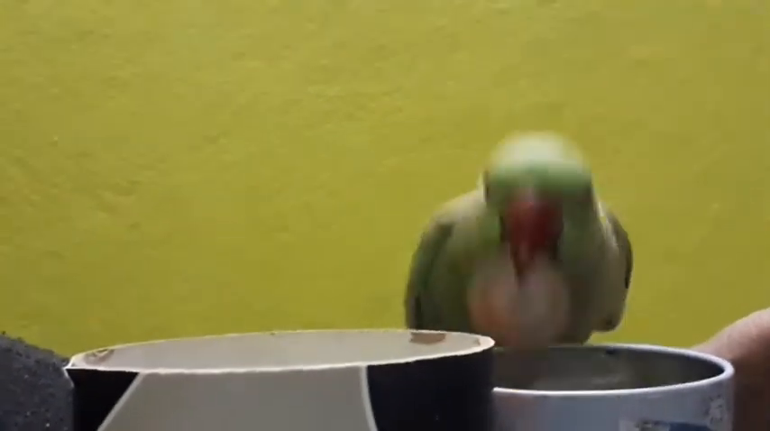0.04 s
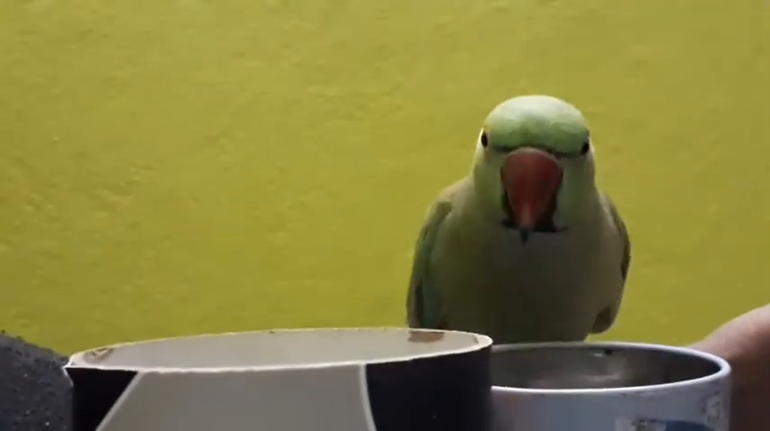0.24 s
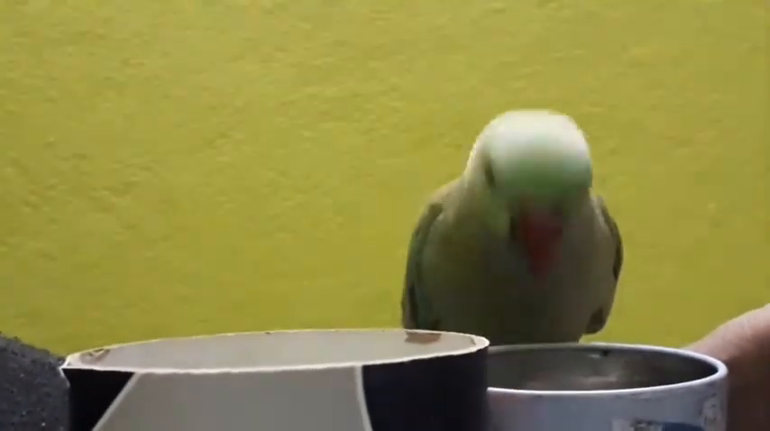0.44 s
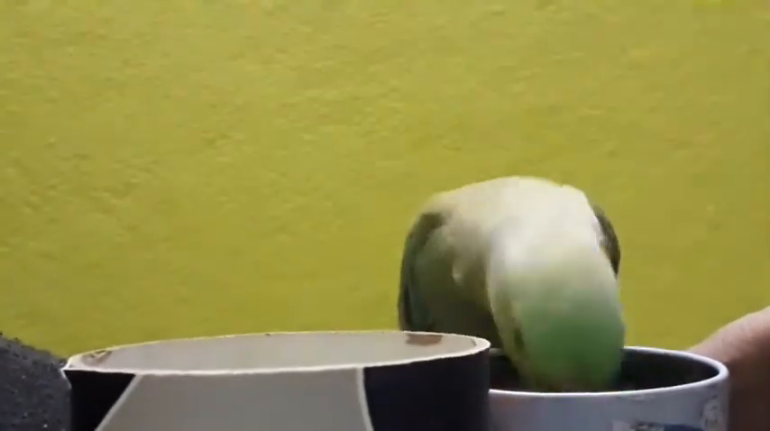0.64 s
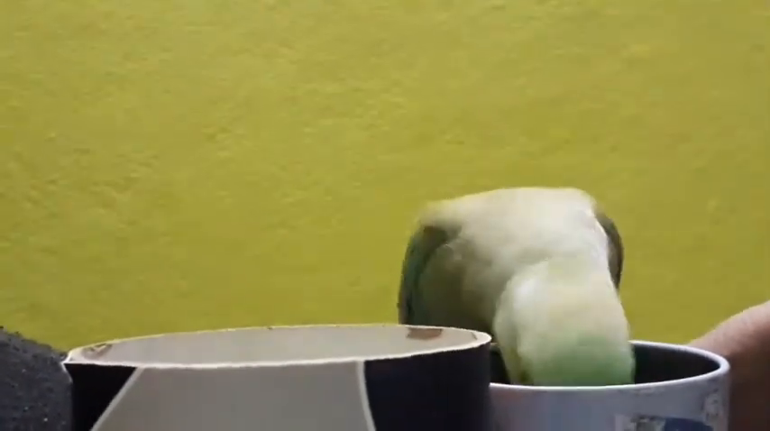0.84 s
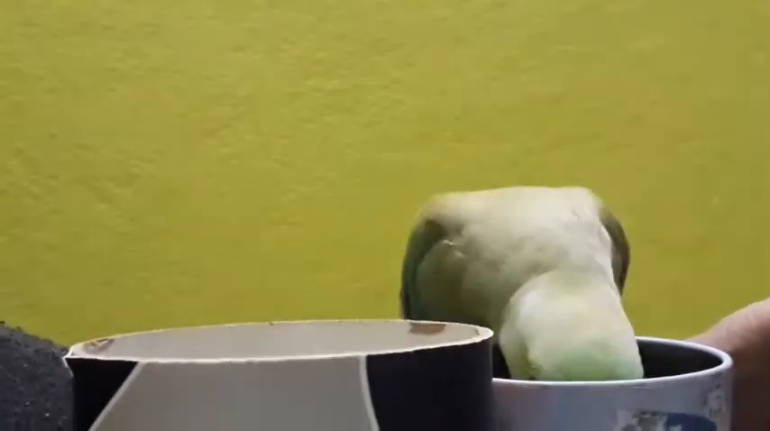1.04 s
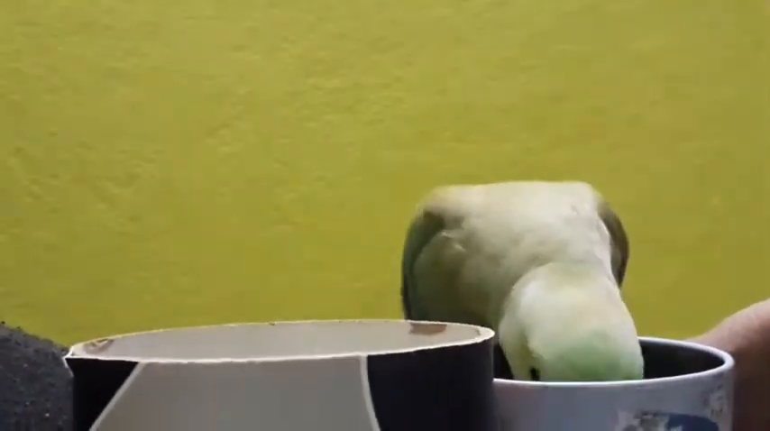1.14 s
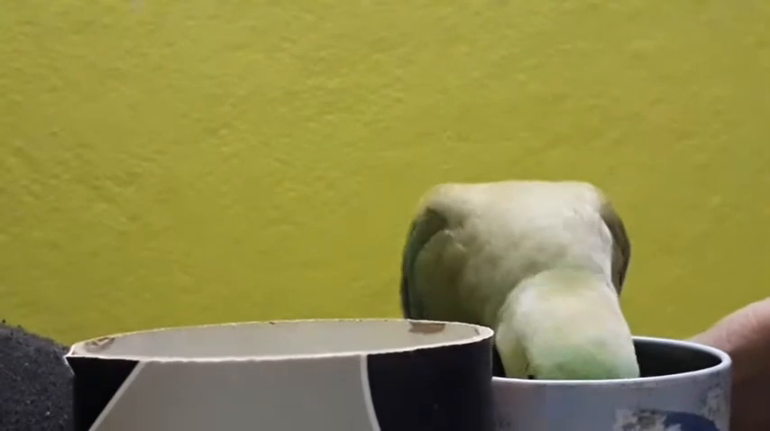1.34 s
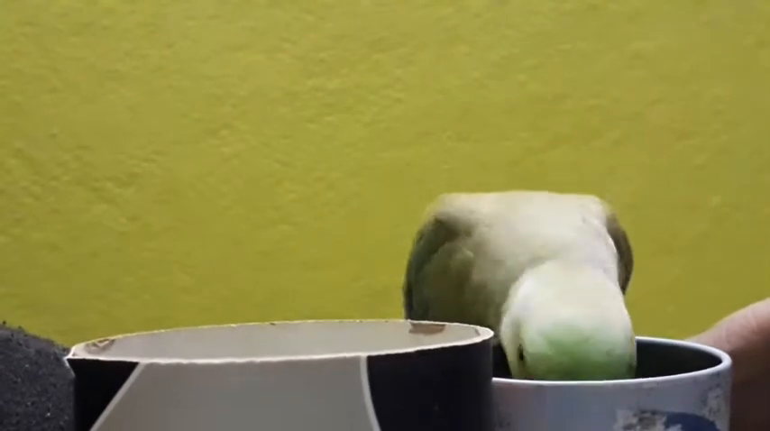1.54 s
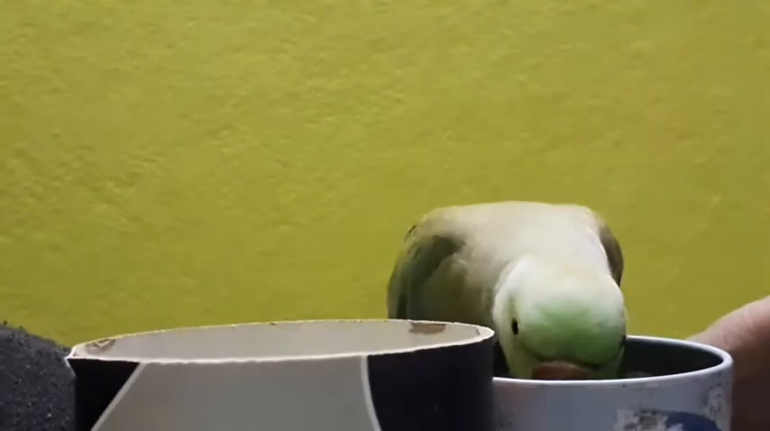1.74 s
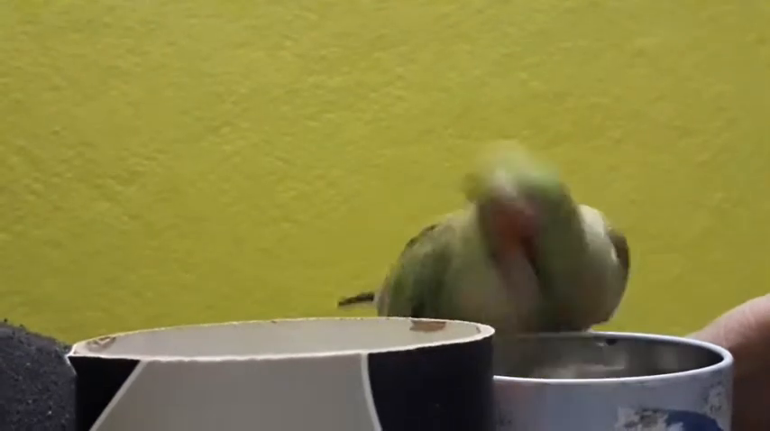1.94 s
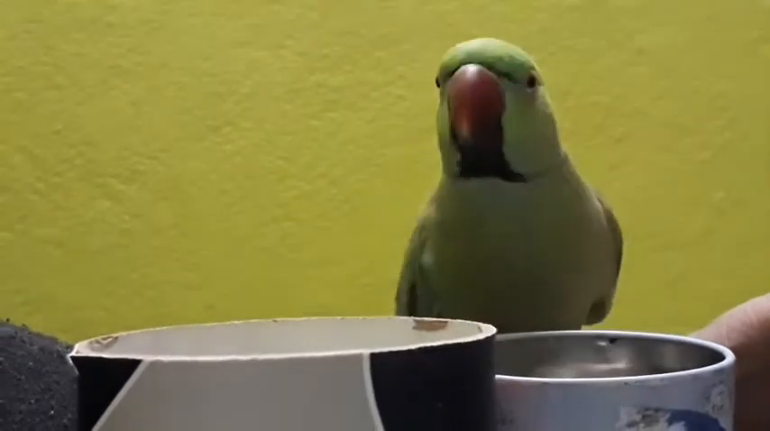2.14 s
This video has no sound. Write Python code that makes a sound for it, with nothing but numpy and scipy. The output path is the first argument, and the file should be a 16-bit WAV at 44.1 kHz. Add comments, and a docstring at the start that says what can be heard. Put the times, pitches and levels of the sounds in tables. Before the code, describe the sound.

Coins clatter loudly in a metal tin as a parakeet drops and picks them, then near quiet with tiny ticks, then a scraping, jingling rattle and a last clink; close phone microphone, small room.

```python
"""Coins clink, ring and scrape in a metal tin as a parakeet lifts, drops and stirs them, close to a phone.
Each contact is a short burst of ticks and noise that knocks the tin; free coins ring at pairs or groups of
close pitches until touched. Scrapes are rough noise with ticks, and faint squeaks are narrow bands of noise.
A small room adds a short tail. Behind it lie hiss, rumble, a hum and the dying tail of earlier clatter."""
import sys
import numpy as np
from scipy import signal
from scipy.fft import rfft, irfft
from scipy.io import wavfile
from scipy.ndimage import uniform_filter1d

SR = 44100
rng = np.random.default_rng(int(sys.argv[2]) if len(sys.argv) > 2 else 0)


def wav_record(signal):
    """Record a signal, one row per channel, as 16-bit PCM in the file named by sys.argv[1]."""
    frames = np.transpose(np.atleast_2d(signal))
    bounded = np.clip(frames, -1, 1)
    # unit amplitude maps onto the largest positive 16-bit level
    quanta = np.round(bounded * 32767).astype(np.int16)
    wavfile.write(sys.argv[1], SR, quanta)


N = 97020  # samples, 2.2 s

# Contacts of coin, beak and tin. Each row: start in seconds, nominal peak level in dB,
# relative strength of bass, middle and treble in dB, fading time of the chatter in ms.
CONTACTS = [(0.137, -40, -25.5, -22, 6, 4.6), (0.212, -11.5, -21.5, -12.5, -12, 4.5),
            (0.224, -10, -28.5, -17, -37, 2.3), (0.228, -6, -24, -10, -5.5, 5.8),
            (0.23, -2.5, -26, -13.5, 0, 3.9), (0.24, -7, -24, -19.5, -10, 3.8),
            (0.247, -13.5, -27.5, -17.5, -19, 5), (0.287, -3, -26, -17.5, -2, 1.3),
            (0.291, -7, -22, -14.5, -11, 4.85), (0.298, -14, -24, -7.5, -17, 0.92),
            (0.321, -14.5, -23, -19, -4, 2), (0.345, -3.5, -23, -15.5, -6.5, 2.4),
            (0.352, -10.5, -19, -12.5, -3, 3.3), (0.767, -51, -10.5, -13, -16.5, 2.5),
            (0.781, -45.5, -14, -10.5, -16, 2.5), (0.786, -56, -12.5, -7, -22, 3.3),
            (0.861, -30.5, -18, -9.5, -9, 0.96), (0.89, -41.5, -15, -22, -28, 1.52),
            (1.04, -61, -6, -22, -18, 4.5), (1.094, -38, -26, -10.5, -14.5, 1.66),
            (1.184, -28, -17.5, -6.5, -18.5, 2.5), (1.267, -44.5, -16, -13, -16.5, 4.9),
            (1.329, -48, -15, -9, -13.5, 1.28), (1.355, -44, -13.5, -5.5, -29.5, 1),
            (1.414, -51.5, -12, -12.5, -13, 2.3), (1.486, -42, -22, -4, -18.5, 0.83),
            (1.546, -23, -25, -10.5, -25, 3.6), (1.556, -26, -27, -3, -17, 0.9),
            (1.588, -27.5, -19, -3, -8, 1.3), (1.617, -17.5, -16, -12.5, -13.5, 1.95),
            (1.634, -19, -33, -30, -24.5, 5.4), (1.649, -20.5, -28, -22, -1, 4.8),
            (1.652, -20, -20, -29, -2, 1.4), (1.661, -27, -35, -17, -12, 3.7),
            (1.684, -16, -19, -17, -15.5, 3.7), (1.692, -18, -26, -10, -4, 1.2),
            (1.711, -7, -17.5, -6, -8, 3.63), (1.718, -15.5, -31.5, -29, -26, 2.1),
            (1.734, -15.5, -19, 0, 25, 2.2), (1.746, -28.5, -11.5, -4, -20, 1.8),
            (1.904, -38, -24, -9, -30, 0.83), (1.914, -25.5, -16, -6, -11, 0.93),
            (1.921, -19.5, -19, -7, -8.5, 1.07), (1.943, -11.5, -23.5, -15, -11.5, 2.66),
            (2.077, -57, -21.5, -3.5, -14.5, 1.8)]
# Basic colour of a contact. Each row: frequency in Hz, level in dB per Hz.
CONTACT_COLOUR = [(250, -20), (500, -17.5), (1000, -6.5), (2000, -2.5), (4000, 4), (8000, 0.5), (12000, 4),
                  (16500, -2)]
CHATTER_PER_S, CHATTER_SPREAD_DB = 7000, 3.5
RISE_SHARE = 0.3  # rise time as a share of the fading time
CREST = 3.16  # nominal peak over the rms of the loudest millisecond
BAND_WIDTH_DB = 10 * np.log10([1800, 4500, 9000])  # widths of bass, middle and treble, from Hz

# Damped modes (natural pitches) of the tin and the coins resting in it.
# Each row: frequency in Hz, width in Hz (at least 160 is used), level in dB.
TIN_MODES = [(550, 50, -1), (1048, 58, -1.5), (1550, 200, -17), (1920, 100, 3), (2350, 200, 0),
             (2650, 200, 0), (3140, 180, -7.5), (3800, 212, -4), (4110, 83, -9.5), (5100, 850, 2),
             (5940, 140, -14), (6640, 350, 0.5), (7500, 910, 0), (9900, 400, -4), (10100, 500, -1.5),
             (11300, 950, -1), (13600, 600, 1.5)]
TIN_DB, TIN_SCATTER_DB = -5, 3  # level beside the bare burst; random spread of each mode's level
TIN_SHIFT = 0.02  # random spread of each mode's pitch, as a share of it

# Modes of three coins. Each row: frequency in Hz, level in dB.
COIN_A_MODES = [(9097, -5), (9148, 0), (15180, 0), (15240, -3)]
COIN_B_MODES = [(9240, -4), (9290, -2), (9400, -5), (14300, -6), (14430, -3), (14530, 0)]
COIN_C_MODES = [(8910, -3), (8945, 0), (9055, -6), (14070, 0), (14190, -4), (14320, -3)]
# Blows that set each coin ringing. Each row: start in seconds, level in dB, extra level of the modes
# above 12 kHz in dB, time to fall by 60 dB in seconds, seconds until the coin is touched.
COIN_A_BLOWS = [(.136, -57.5, -1, 1.28, 0.065), (.213, -18.5, 5, 0.85, 0.0096),
                (.233, -27, 8.5, 0.29, 0.03), (.248, -22.5, 0, .3, 0.058), (.298, -29, 5, 0.1, 0.027),
                (1.654, -29, -2, .04, 0.011)]
COIN_B_BLOWS = [(.861, -58, -2, .12, .07), (1.0945, -57, -1, .12, .08), (1.269, -66, -3, .12, .07)]
COIN_C_BLOWS = [(1.722, -36, -5, .17, .07), (1.9435, -25, -8, .04, .022), (1.966, -56, -4, .2, .1)]

# Two stretches of coins dragged over each other. Each row: time in seconds, level in dB before tilting,
# tilt in dB (added above about 3 kHz and taken off below).
DRAGS = [
    [(.76, -78, -2.5), (.8, -70, -4.5), (.83, -59, -6.5), (.88, -65.5, -8), (.93, -67, -4.5),
     (.97, -83.5, 2)],
    [(1.18, -74, -22), (1.23, -65.5, -4.5), (1.3, -71.5, -6), (1.42, -72, -5), (1.5, -67.5, -7.5),
     (1.535, -64, 6), (1.55, -45.5, -3), (1.58, -44, -0.5), (1.61, -41.5, -1.5), (1.63, -34.5, -0.5),
     (1.642, -37.5, -0.5), (1.651, -23.5, 0.5), (1.659, -43.5, -10), (1.68, -38, -3), (1.70, -40, -2),
     (1.725, -31.5, 1), (1.75, -41, 0.5), (1.78, -59, 0), (1.84, -54, -6), (1.895, -58.5, -4),
     (1.91, -48, 5.5), (1.935, -52, -7), (1.96, -71, -0.5), (2.02, -73, 1), (2.2, -74.5, -7.5)],
]
# Colour of the scraping. Each row: frequency in Hz, level in dB per Hz.
DRAG_COLOUR = [(120, -55), (200, -20.5), (573, 2.5), (1290, 0.5), (4290, 10.5), (9310, 7), (11000, -4.5),
               (15300, 4), (16500, -15.5)]
DRAG_TICKS_PER_S, DRAG_SPREAD_DB = 3000, 3

# Faint squeaks. Each row: start in seconds, level in dB before the swell, frequency in Hz, length in seconds.
SQUEAKS = [(.82, -61.5, 1317, 0.044), (.822, -65.5, 4020, 0.022), (0.86, -62, 1533, .03),
           (1.807, -53, 1300, 0.039), (1.83, -62, 1480, 0.049), (2.061, -70, 402, 0.083),
           (2.12, -68.5, 546, 0.13)]
SQUEAK_WIDTH_HZ = 110

# Decay of the room. Each row: frequency in Hz, time to fall by 60 dB in seconds.
ROOM_DECAY = [(500, .34), (2000, 0.17), (6000, 0.22), (16000, 0.14)]
ROOM_DB, ROOM_RISE_S = -7, 0.0013

# Colour of the low part of the quiet floor. Each row: frequency in Hz, level in dB per Hz.
LOW_FLOOR_COLOUR = [(15, -65), (25, -45), (102, -10), (166, -22.5), (308, -17.5), (328, -30), (386, -18),
                    (618, -20), (1200, -33.5), (1560, -70), (2640, -120)]
# Colour of the hiss. Each row: frequency in Hz, level in dB per Hz.
HISS_COLOUR = [(590, -35.5), (1000, -7.5), (2050, -12), (2230, -15), (2620, -10.5), (7020, -21),
               (16000, -16.5)]
LOW_FLOOR_DB, HISS_DB = -75.5, -77.5
# Changing level of the rumble. Each row: time in seconds, level in dB.
RUMBLE_LEVEL = [(0.0, -58), (0.2, -58), (0.46, -70.5), (0.85, -80.5), (1.19, -80.5), (1.56, -74),
                (1.73, -71), (2.2, -71)]
# Colour of the rumble. Each row: frequency in Hz, level in dB per Hz.
RUMBLE_COLOUR = [(24, -32.5), (40, -4), (140, 4.5), (386, -6), (482, -15.5), (541, -3.5), (900, -11),
                 (1170, -53.5), (1980, -120)]
HUM_HZ, HUM_DB, HUM_WAVER_DB = 95.4, -67.5, 2  # the pitch and level wander around these
# Colour of the tail of earlier clatter. Each row: frequency in Hz, level in dB per Hz.
EARLIER_COLOUR = [(470, -38.5), (800, -17.5), (1210, -20.5), (1340, -17), (3420, -3.5), (4340, -12.5),
                  (9690, -21), (16000, -27.5)]
EARLIER_DB, EARLIER_T60_S = -56.5, 0.65  # level at the start; time to fall by 60 dB
# Difference between the channels. Each row: frequency in Hz, level in dB relative to the middle.
SIDE_COLOUR = [(30, -28), (80, -44), (300, -32), (700, -38), (1500, -50), (3500, -52), (4800, -27),
               (16000, -30)]


def undb(db):
    """Turn dB into gain."""
    return 10 ** (np.asarray(db) / 20)


def unit(x):
    """Scale to rms 1."""
    return x / np.sqrt(np.mean(x ** 2) + 1e-30)


def at_hz(table, hz):
    """Read a table of frequency and value on a log-frequency axis."""
    table = np.array(table, float)
    return np.interp(np.log(np.maximum(hz, 1)), np.log(table[:, 0]), table[:, 1])


def colour(x, table):
    """Filter x with the gains of a table of Hz and dB."""
    hz = np.arange(len(x) // 2 + 1) * SR / len(x)
    return irfft(rfft(x) * undb(at_hz(table, hz)), len(x))


def coloured_noise(table):
    """Steady noise of rms 1 with the colour of a table."""
    return unit(colour(rng.standard_normal(N), table))


def add(out, x, s):
    """Mix x into out from time s in seconds."""
    i = int(round(s * SR))
    out[i:i + len(x)] += x[:len(out) - i]


def walk(rate):
    """Slow random wander with a spread near 1, from smoothed random steps (rate per second)."""
    k = int(SR / rate)
    steps = np.repeat(rng.standard_normal(N // k + 1), k)
    return 1.3 * uniform_filter1d(uniform_filter1d(steps, k), k)[:N]


def ticks(size, per_s, spread_db):
    """Random ticks of either sign and uneven strength."""
    present = rng.random(size) < per_s / SR
    strength = undb(spread_db * np.minimum(rng.exponential(size=size), 4))
    return present * np.sign(rng.standard_normal(size)) * strength


def clinks():
    """Each contact is a fading burst of ticks and noise that knocks the damped modes of the tin."""
    out, t = np.zeros(N), np.arange(4096) / SR
    hz, width, db = np.array(TIN_MODES, float).T[:, :, None]
    damping = np.exp(-np.pi * np.maximum(width, 160) * t)
    for s, peak_db, bass_db, mid_db, treble_db, ms in CONTACTS:
        env = (1 - np.exp(-t * 1000 / (RISE_SHARE * ms))) * np.exp(-t * 1000 / ms)
        chatter = ticks(len(t), CHATTER_PER_S, CHATTER_SPREAD_DB)
        burst = env * (chatter + rng.standard_normal(len(t)))
        gains = undb(db + TIN_SCATTER_DB * rng.standard_normal(hz.shape))
        mode_hz = hz * (1 + TIN_SHIFT * rng.standard_normal(hz.shape))
        tin = (gains * np.sin(2 * np.pi * mode_hz * t) * damping).sum(axis=0)
        knocked = signal.fftconvolve(burst, tin)[:len(t)]
        hit = unit(burst) + undb(TIN_DB) * unit(knocked)
        hit = np.roll(hit, 64)  # leave room for what the colouring spreads ahead of the onset
        bands = np.array([bass_db, mid_db, treble_db]) - BAND_WIDTH_DB
        hit = colour(colour(hit, CONTACT_COLOUR), list(zip([1400, 4200, 11000], bands)))
        loudest_rms = np.sqrt(uniform_filter1d(hit ** 2, size=44).max())
        add(out, undb(peak_db) * hit / loudest_rms / CREST, s - 64 / SR)
    return out


def coin(modes, blows):
    """A coin's closely spaced modes ring from each blow and die fast once it is touched."""
    out, t = np.zeros(N), np.arange(6000) / SR
    hz, db = np.array(modes, float).T[:, :, None]
    for s, level_db, upper_db, t60, free in blows:
        gains = undb(db + upper_db * (hz > 12000))
        tone = (gains * np.sin(2 * np.pi * (hz * t + rng.random(hz.shape)))).sum(axis=0)
        rise = 1 - np.exp(-t / 0.00029)
        ringing = 1000. ** (-t / t60)
        touched = np.exp(-np.maximum(t - free, 0) / 0.0027)
        add(out, undb(level_db) * tone * rise * ringing * touched, s)
    return out


def scrapes():
    """Dragged coins make rough noise with dense ticks on a level curve, duller or brighter by the tilt."""
    t, out = np.arange(N) / SR, np.zeros(N)
    grit = ticks(N, DRAG_TICKS_PER_S, DRAG_SPREAD_DB) + 4.2 * rng.standard_normal(N)
    grit = colour(grit, DRAG_COLOUR)
    grit = grit / np.std(grit)
    low = signal.sosfilt(signal.butter(2, 3000, fs=SR, output="sos"), grit)
    for rows in DRAGS:
        s, db, tilt_db = np.array(rows, float).T
        gain = undb(np.interp(t, s, db)) * (t > s[0]) * (t < s[-1])
        tilt = undb(np.interp(t, s, tilt_db))
        out += gain * (low / tilt + (grit - low) * tilt)
    return out


def squeaks():
    """Faint rough squeaks: narrow noise in a soft swell."""
    out = np.zeros(N)
    for s, db, hz, length in SQUEAKS:
        t = np.arange(int(length * SR)) / SR
        reach = 3 * SQUEAK_WIDTH_HZ
        narrow = colour(rng.standard_normal(8192), [(hz - reach, -45), (hz, 0), (hz + reach, -45)])
        swell = np.sin(np.pi * t / length)
        add(out, undb(db) * unit(narrow[:len(t)]) * swell, s)
    return out


def room(x):
    """A diffuse tail: one noise split into overlapping octave bands, each with its own decay."""
    t, tail = np.arange(int(SR / 2)) / SR, 0
    noise = rfft(rng.standard_normal(len(t)))
    octave = np.log2(np.maximum(np.arange(len(t) // 2 + 1) * SR / len(t), 125))
    for hz in 125 * 2. ** np.arange(8):
        band = irfft(noise * np.clip(1 - np.abs(octave - np.log2(hz)), 0, 1), len(t))
        tail = tail + band * 1000. ** (-t / at_hz(ROOM_DECAY, hz))
    tail = tail * np.clip(t / ROOM_RISE_S, 0, 1)
    return undb(ROOM_DB) * signal.fftconvolve(x, tail / np.sqrt(np.sum(tail ** 2)))[:N]


def earlier_clatter():
    """Coloured noise that fades from the start, as the dying tail of earlier clatter."""
    fade = 1000. ** (-np.arange(N) / SR / EARLIER_T60_S)
    return undb(EARLIER_DB + 1.3 * walk(29.2)) * fade * coloured_noise(EARLIER_COLOUR)


def rumble():
    """Low noise that follows a level curve and flutters slightly."""
    s, db = np.array(RUMBLE_LEVEL, float).T
    level_db = np.interp(np.arange(N) / SR, s, db) + 0.83 * walk(42)
    return undb(level_db) * coloured_noise(RUMBLE_COLOUR)


def hum():
    """A low sine tone whose pitch and level waver."""
    phase = 2 * np.pi * np.cumsum(HUM_HZ * (1 + 0.015 * walk(5.1))) / SR
    return undb(HUM_DB + HUM_WAVER_DB * walk(2.8)) * np.sin(phase)


def quiet_floor():
    """A slowly wavering low noise and a steady hiss."""
    low = undb(LOW_FLOOR_DB + 2.0 * walk(9.5)) * coloured_noise(LOW_FLOOR_COLOUR)
    return low + undb(HISS_DB) * coloured_noise(HISS_COLOUR)


def scene():
    """All sources sit in the middle; a smeared copy makes the two channels differ faintly."""
    coins = coin(COIN_A_MODES, COIN_A_BLOWS) + coin(COIN_B_MODES, COIN_B_BLOWS) + coin(COIN_C_MODES, COIN_C_BLOWS)
    close = clinks() + coins + scrapes() + squeaks()
    mono = close + room(close) + earlier_clatter() + rumble() + hum() + quiet_floor()
    smear = rng.standard_normal(1024) / 32
    side = colour(np.convolve(mono, smear, mode="same"), SIDE_COLOUR)
    return np.array([mono + side, mono - side])


def top_cut(x):
    """Nothing passes above the cut-off."""
    return signal.sosfilt(signal.butter(12, 16950, fs=SR, output="sos"), x)


def record(dry):
    """The phone cuts the top steeply above 15.8 kHz."""
    mix = signal.sosfilt(signal.ellip(8, 0.3, 60, 15800, fs=SR, output="sos"), dry)
    return top_cut(mix)


dry = scene()
out = record(dry)
wav_record(out)
```